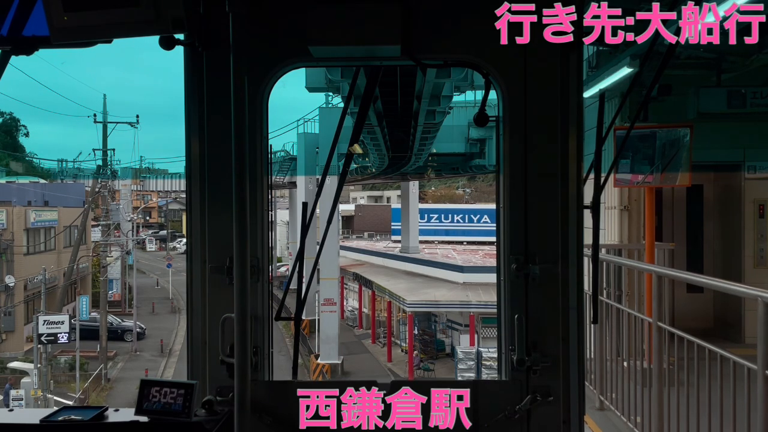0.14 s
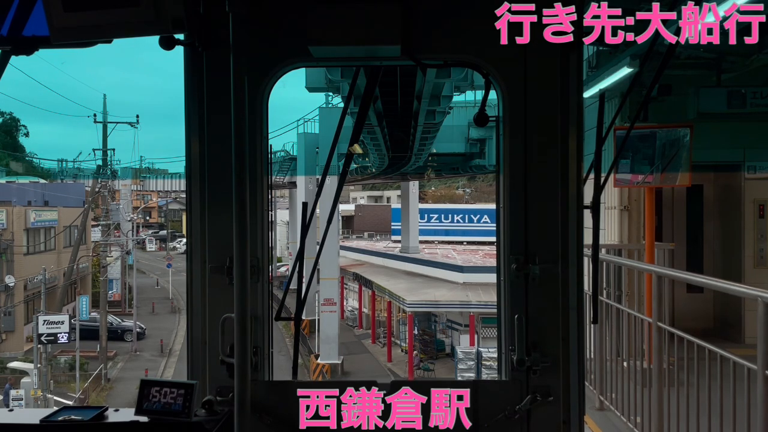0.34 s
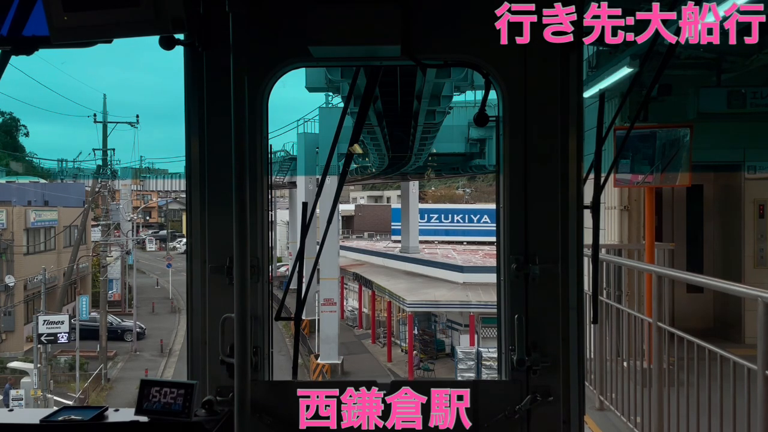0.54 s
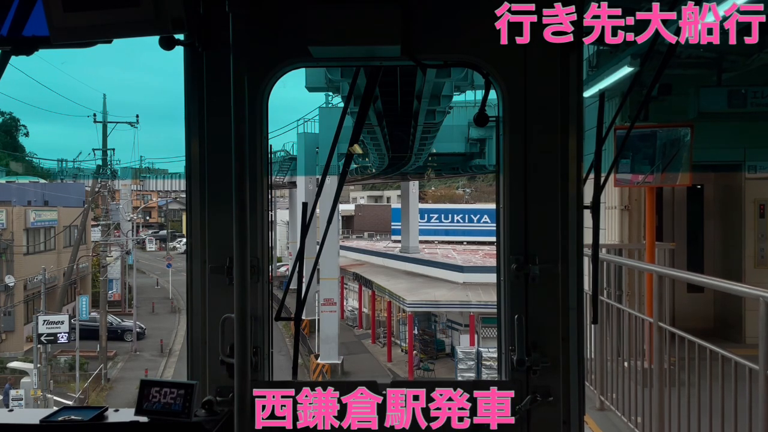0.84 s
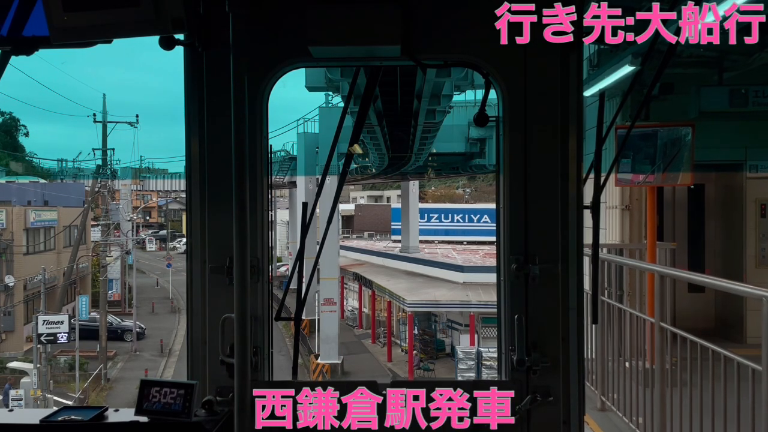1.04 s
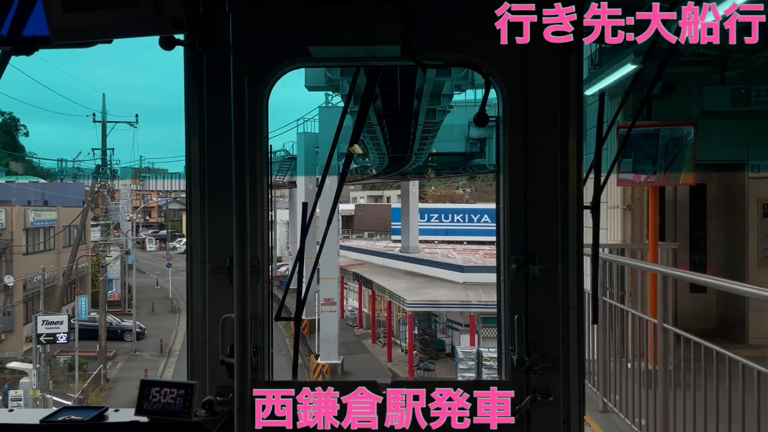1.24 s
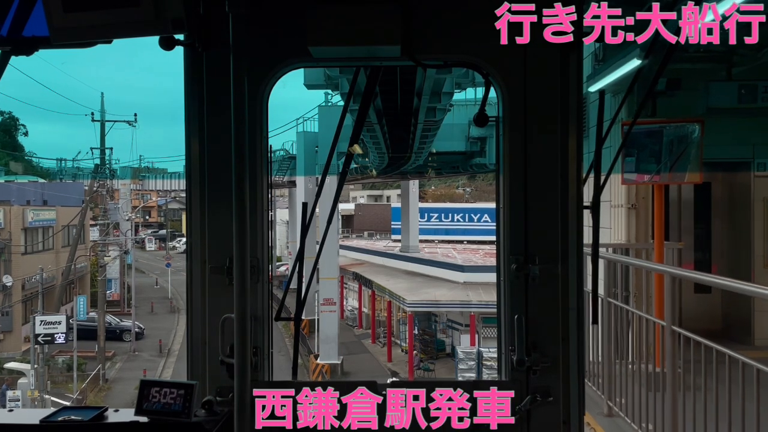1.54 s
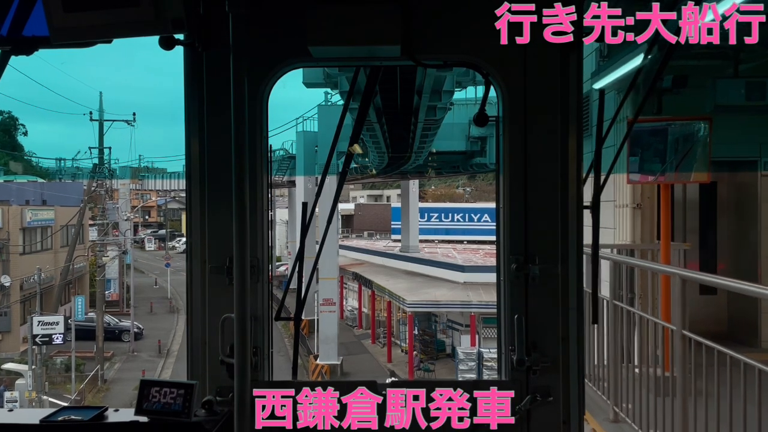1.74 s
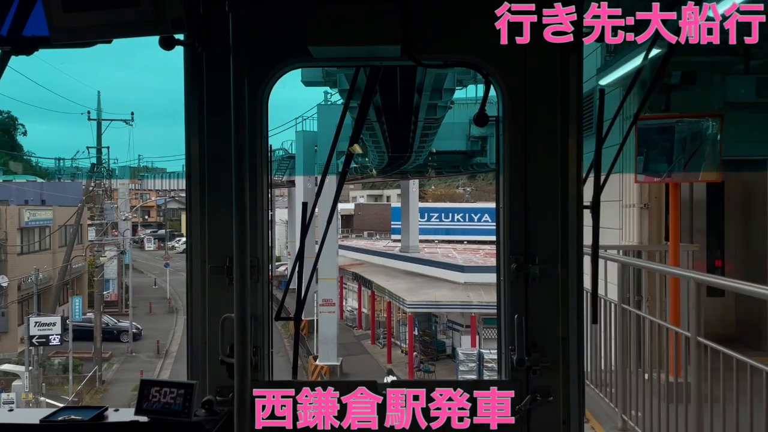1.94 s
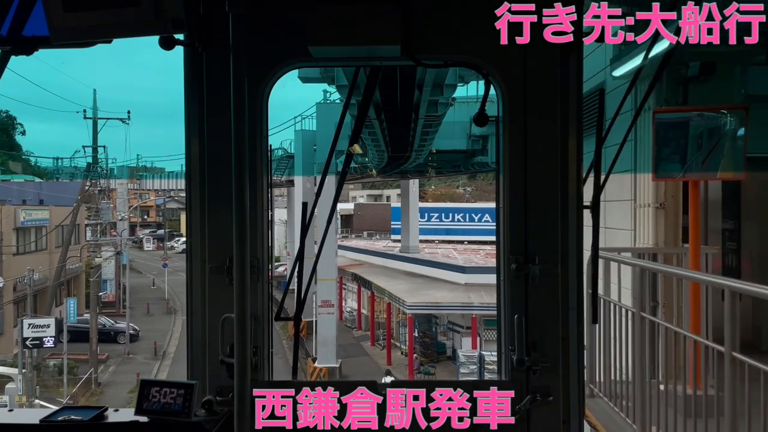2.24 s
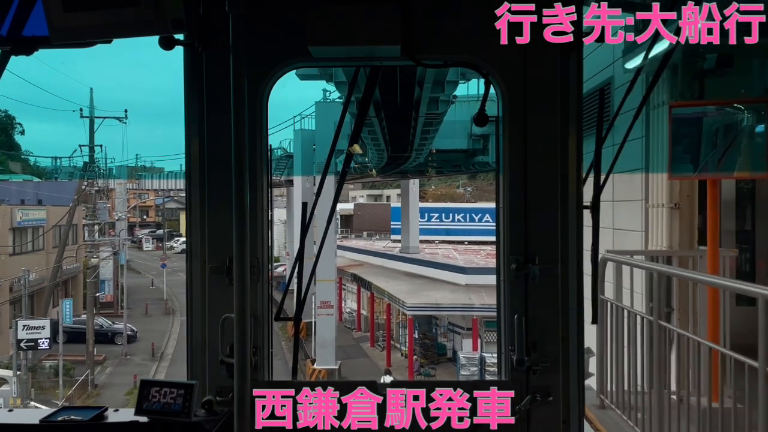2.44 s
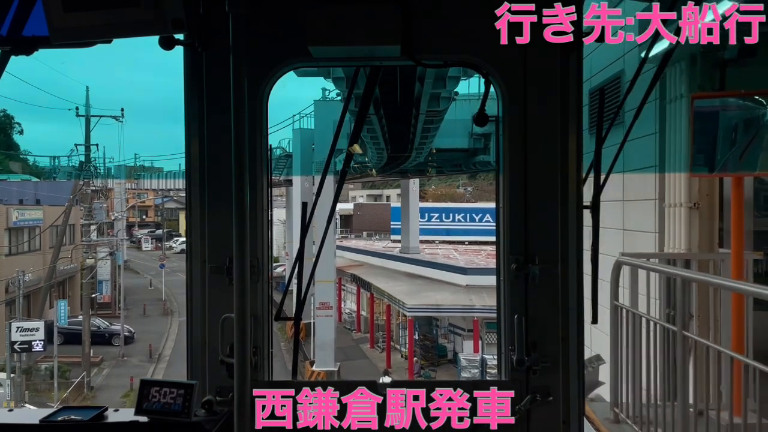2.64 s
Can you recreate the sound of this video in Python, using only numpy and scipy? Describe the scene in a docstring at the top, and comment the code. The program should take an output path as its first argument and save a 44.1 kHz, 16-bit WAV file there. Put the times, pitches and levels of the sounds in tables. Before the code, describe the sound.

A suspended rail car pulls away, heard close inside the cab. A steady hum near 280 Hz swells to its strongest around 0.7-0.95 s, edges slightly upward in pitch, then fades. Uneven hollow rumble, faint airy hiss and very weak whines continue. Light ticks, scuffs and dull thuds begin at 0.3-0.4 s; a hard click snaps left at 1.27 s with a thump; knocks cluster around 1.55-2.1 s, then calmer humming.

```python
"""Inside a suspended monorail car as it starts to move, heard at two close microphone ports.
From the start a steady tone hums, swells and fades over resonant rolling noise, broadband air hiss and
faint narrowband whines. From 0.3 s come light ticks and scuffs, decaying noise bursts from the left, and
from 0.4 s dull thuds that ring the modes of the body. At about 1.27 s one hard click sounds from the left:
short modes, a noise crack and a diffuse tail."""
import sys
import numpy as np
from scipy import signal
from scipy.fft import rfft, irfft, next_fast_len
from scipy.io import wavfile
from scipy.ndimage import uniform_filter1d, minimum_filter1d, map_coordinates

SR = 44100
rng = np.random.default_rng(int(sys.argv[2]) if len(sys.argv) > 2 else 0)


def store_wav(level_fs):
    """Save 16-bit WAV to argv[1]."""
    pcm = np.round(np.clip(np.atleast_2d(level_fs), -1, 1) * 32767)
    wavfile.write(sys.argv[1], SR, pcm.T.astype(np.int16))


N = 123479

# Course of the hum: (time [s], pitch [Hz], level [dB])
HUM_COURSE = [(0, 278, -27), (.12, 278, -29), (.34, 277.5, -23.5), (.54, 277.5, -20.5), (.7, 277.6, -15.5),
              (.92, 277.8, -15), (.99, 281, -16), (1.2, 281.5, -19), (1.4, 283, -20), (1.6, 281.5, -22),
              (1.85, 280.5, -23.5), (2.15, 280.5, -23), (2.45, 280.5, -26), (2.8, 280.5, -30.5)]
HUM_WAVER_DB, HUM_SIDE_DB = .7, -13

# Modes of the car body: (frequency [Hz], bandwidth [Hz], relative level [dB], basic t60 [s])
BODY_MODES = [(54.4, 14.5, 0, 0.27), (79.87, 10.3, -0.5, 0.6), (120.03, 6.9, 1.5, 0.43),
              (193.9, 27.1, -0.5, .3), (234.4, 11.94, 9, 0.28), (294.6, 25, -2.5, 0.53),
              (312.3, 16.7, -6.5, 0.42), (431.3, 23.6, -12.5, 0.16), (533.7, 46, -23.5, 0.086),
              (691, 90, -26.5, 0.083)]

# Course of the rolling noise: (time [s], level over 150 Hz [dB], level under 150 Hz [dB])
ROLL_COURSE = [(0, -25.5, -28.5), (.15, -31, -35), (.45, -28, -35), (.7, -33, -30), (1.0, -26.5, -34),
               (1.2, -23, -30), (1.5, -26.5, -24), (1.75, -26.5, -34), (1.95, -24, -22.5), (2.3, -29, -28),
               (2.8, -34.5, -32.5)]
ROLL_SIDE_DB = -13.5

# Course of the hiss: (time [s], level [dB])
AIR_COURSE = [(0.0, -47), (2.8, -45)]
# Relative spectrum of the sum of the ports: (frequency [Hz], density [dB per Hz])
AIR_MID_SPECTRUM = [(180, -42.5), (300, -1.5), (326, -16.5), (418, -13), (454, -14), (798, -27),
                    (911, -23.5), (1650, -28), (6990, -53.5), (8670, -85), (11100, -64), (15800, -70)]
# Relative spectrum of their difference: (frequency [Hz], density [dB per Hz])
AIR_SIDE_SPECTRUM = [(180, -37.5), (300, -8.5), (321, -5), (654, -4.5), (759, -8), (1450, -15),
                     (2760, -27.5), (3490, -30), (8820, -41), (15800, -77)]
AIR_SIDE_DB, AIR_LEFT = -4.5, .2  # side against mid; share of the mid noise in the side

# Lines of fans and equipment: (frequency [Hz], level [dB], width at half amplitude [Hz])
WHINE_LINES = [(1740, -59, 90), (2525, -67, 14), (2635, -66, 14), (3540, -63.5, 260)]

# Noise bursts: (time [s], level before the envelope [dB], rise [s], t60 [s], centre [Hz],
#                distance from centre to 1/e amplitude [octaves])
SCUFF_BURSTS = [(.32, -55, .001, .06, 10500, .27), (.53, -42.5, .0012, .056, 3600, .37),
                (.563, -30, .0015, .07, 650, .4), (.585, -25, .022, .3, 553, .64),
                (.58, -44, .033, .37, 3500, .9), (.688, -48.5, .001, .028, 4490, .28),
                (.855, -30, .001, .06, 650, .7), (1.119, -40, .002, .25, 1800, 1.5),
                (1.135, -31, .01, .18, 600, .58), (1.298, -29, .006, .3, 600, .35),
                (1.57, -47, .012, .3, 4170, .8), (1.693, -33.5, .004, .1, 600, .53),
                (1.81, -32, .0088, .12, 750, .9), (1.913, -31, .002, .08, 600, .5),
                (1.914, -39.5, .029, .15, 4960, .4), (1.97, -17, .007, .33, 380, .75),
                (1.974, -31, .001, .053, 1500, .42), (2.004, -33, .004, .12, 1750, .4),
                (2.005, -49, .006, .13, 11500, .26), (2.005, -34, .0061, .18, 2500, 2.1),
                (2.126, -49, .0024, .054, 7040, .61)]
SCUFF_PAN_DB, SCUFF_WIDE = 3.5, 0.067  # left over right; gain of the unshared noise

# Blows: (time [s], level [dB], boom under 100 Hz [dB], boom from 100 to 150 Hz [dB],
#         tilt of the upper modes [dB per octave], share of the basic t60 left to the upper modes)
THUD_BLOWS = [(.40, -28.5, 11, -14.5, -1, .9), (.46, -30.5, 14, -8, -1, .9),
              (0.561, -24, -13.5, 1, 12, 1.2), (0.604, -18, -3, -13.5, 12.5, 0.48),
              (0.656, -21.5, -22, 4, -6, 0.99), (0.852, -26, -16, -7.5, -10.5, 1.4),
              (1.135, -33, -1, -13.5, 21.5, 0.88), (1.277, -11.5, -10, -17, 6, 0.45),
              (1.29, -9, -8.5, -10, 4, 0.26), (1.553, -16, -1.5, -9.5, 1, 1.25),
              (1.694, -29, -2, -13, -1, 0.84), (1.81, -25.5, -2, 0.5, 14, .9),
              (1.962, -13.5, -12, -6, -5, 0.36), (1.974, -9, -7, -11, 14.5, 0.55),
              (1.995, -20, -9, -7.5, -5, .9), (2.109, -19.5, -9, -2, -6, 0.8)]
THUD_RISE_S, THUD_SIDE_DB = 0.0056, -12  # rise is a time constant

# Modes of the click: (frequency [Hz], relative level [dB], t60 [s])
CLICK_MODES = [(350.5, 10.5, 0.047), (435.4, 5.5, 0.092), (519, 3, 0.066), (718, -5, 0.099),
               (911, -7, 0.09), (1096, -15.5, 0.11), (1258, -5, 0.055), (1416, -8.5, 0.043),
               (1667, -16.5, 0.051), (1990, -12, 0.033), (2586, 0.5, 0.026), (2870, -10.5, 0.027),
               (3556, 3, 0.022), (4560, -11.5, 0.02)]
# Relative spectrum of the click noise: (frequency [Hz], gain [dB])
CLICK_SPECTRUM = [(300, -8.5), (1000, -4.5), (3000, -6.5), (5000, -9.5), (7000, -18), (9000, -33.5),
                  (16000, -73)]
CLICK_S, CLICK_DB, CLICK_PAN_DB = 1.2655, -9.5, 8.5
CLICK_RISE_S, CLICK_RISE_CYCLES = 0.0008, 4  # rise of the whole; rise of each mode
CLICK_NOISE_DB, CLICK_NOISE_T60 = -2.5, 0.043
CLICK_DULL_HZ, CLICK_BRIGHT_T60 = 4500, .022  # the noise above this frequency decays faster
CLICK_TAIL_DB, CLICK_TAIL_T60 = -20, 0.23

# Phase offset between the channels of the bursts and the click: (frequency [Hz], offset [rad])
PHASE_OFFSET = [(330, -0.23), (600, 2), (2000, 0), (4500, 1), (7000, 1.5), (8600, -19.5), (10500, 5.5),
                (12000, 7.5), (16000, 8.5)]
# Band in which the left channel is raised and the right lowered: (lower edge [Hz], upper edge [Hz])
PAN_BAND = (400, 6500)
TOP_HZ, PEAK_LIMIT = 15800, .92


def amp(db):
    """Decibel law: level to amplitude ratio."""
    return 10 ** (np.asarray(db) / 20)


def unit(x):
    """Normalisation of power: scale to rms 1."""
    return x / np.sqrt(np.mean(x ** 2) + 1e-20)


def along(points, hz):
    """Linear interpolation of (frequency, value) points on a logarithmic frequency axis."""
    f, v = np.transpose(points)
    return np.interp(np.log(hz + 1), np.log(f + 1), v)


def curves(rows):
    """Linear interpolation in time: one value per sample for each column after the time."""
    times, *columns = np.transpose(rows)
    return [np.interp(np.arange(N) / SR, times, column) for column in columns]


def wobble(rate):
    """Spline interpolation of random knots, rate a second, into a smooth curve."""
    knots = rng.standard_normal(int(N * rate / SR) + 4)
    return map_coordinates(knots, [np.arange(N) * rate / SR])


def filtered(x, response):
    """Convolution theorem: multiply the spectrum of x by a response of frequency."""
    n = x.shape[-1]
    m = next_fast_len(n + 8192)
    return irfft(rfft(x, m) * response(np.fft.rfftfreq(m, 1 / SR)), m)[..., :n]


def patchy(depth_db):
    """Time-frequency modulation: two independent noises share patches of random gain."""
    z = signal.stft(rng.standard_normal((2, N)), nperseg=512)[2]
    field = rng.standard_normal(z.shape[1:])
    field = uniform_filter1d(field, size=8, axis=0)
    field = uniform_filter1d(field, size=8, axis=1, mode="wrap")
    return signal.istft(z * amp(depth_db * unit(field)), nperseg=512)[1][:, :N]


def ports(x, pan_db):
    """Stereo placement: a frequency-dependent phase offset, and a mid-band level difference to the left."""
    low, high = PAN_BAND

    def lean(hz):
        band = hz ** 4 / (hz ** 4 + low ** 4) / (1 + (hz / high) ** 6)
        return amp(pan_db / 2 * band)

    def response(hz):
        return np.array([lean(hz), np.exp(-1j * along(PHASE_OFFSET, hz)) / lean(hz)])

    return filtered(x, response)


def stereo(mid, side):
    """Sum-and-difference principle: left is mid plus side, right is mid minus side."""
    return np.array([mid + side, mid - side])


def add(track, s, x):
    """Superposition: mix x into track at time s."""
    part = track[..., round(s * SR):][..., :x.shape[-1]]
    part += x[..., :part.shape[-1]]


def hum():
    """Frequency modulation: the phase integrates a drifting pitch; a quadrature side offsets the ports."""
    hz, db = curves(HUM_COURSE)
    phase = 2 * np.pi * np.cumsum(hz) / SR
    tone = stereo(np.sin(phase), amp(HUM_SIDE_DB) * np.cos(phase))
    return np.sqrt(2) * amp(db + HUM_WAVER_DB * wobble(12.62)) * tone


def roll():
    """Forced resonance: wheel noise excites the body modes; low and high modes swell apart."""
    def modes(f):
        total = 0
        for k, (centre, width, db, _) in enumerate(BODY_MODES):
            resonance = 1j * f * width / (centre * centre - f * f + 1j * f * width)
            total = total + (-1) ** k * amp(db) * resonance  # neighbours alternate in sign
        return total

    noise = rng.standard_normal((2, N))
    high_db, low_db = curves(ROLL_COURSE)
    high = unit(filtered(noise, lambda f: modes(f) * (f > 150)))
    low = unit(filtered(noise, lambda f: modes(f) * (f <= 150) * f ** 2 / (f ** 2 + 40 ** 2)))
    mid, side = amp(high_db) * high + amp(low_db) * low
    return stereo(mid, side * amp(ROLL_SIDE_DB))


def air():
    """Broadband flow noise: the wide hiss of the ventilation, slightly to the left."""
    a, b = patchy(depth_db=.7)
    # The level refers to the mid signal between 600 and 6000 Hz.
    reference = unit(filtered(a, lambda f: amp(along(AIR_MID_SPECTRUM, f)) * (f > 600) * (f < 6000)))
    mid = filtered(a, lambda f: amp(along(AIR_MID_SPECTRUM, f)) * (f > 280))
    mid = mid * np.dot(reference, reference) / np.dot(reference, mid)
    side = filtered(b + AIR_LEFT * a, lambda f: amp(along(AIR_SIDE_SPECTRUM, f)) * (f > 280))
    side = unit(side) * np.std(mid) * amp(AIR_SIDE_DB)
    return amp(curves(AIR_COURSE)[0] + 0.4 * wobble(24)) * stereo(mid, side)


def whines():
    """Narrowband noise: faint fuzzy lines of fans and equipment."""
    def line(hz, width):
        noise = rng.standard_normal((2, N))
        return unit(filtered(noise, lambda f: 1 / (1 + ((f - hz) / width * 2) ** 2)))

    return sum(amp(db) * line(hz, width) for hz, db, width in WHINE_LINES)


def scuffs():
    """Transient friction noise: light ticks and scrapes as decaying bursts round a centre frequency."""
    out, t = np.zeros((2, N)), np.arange(SR // 4) / SR
    for s, db, rise, t60, hz, octaves in SCUFF_BURSTS:
        def band(f):
            return np.exp(-(np.log2((f + 1) / hz) / octaves) ** 2)

        near, *wide = unit(filtered(rng.standard_normal((3, len(t))), band))
        shape = amp(db - 60 * t / t60) * np.minimum(t / rise, 1)
        add(out, s, shape * (ports(near, SCUFF_PAN_DB) + SCUFF_WIDE * np.array(wide)))
    return out


def thuds():
    """Modal superposition: soft blows on the floor ring the body modes, each decaying exponentially."""
    out, t = np.zeros((2, N)), np.arange(SR // 2) / SR
    hz, _, level, t60 = (column[:, None] for column in np.transpose(BODY_MODES))
    for s, db, boom_db, second_db, tilt_db, share in THUD_BLOWS:
        upper_db = tilt_db * np.log2(hz / 235)
        extra = np.where(hz < 100, boom_db, np.where(hz < 150, second_db, upper_db))
        extra = extra + np.where(hz < 70, -10, 0)
        ring_t60 = t60 * np.where(hz < 150, 1, share)
        rings = amp(db + level + extra - 60 * t / ring_t60) * (1 - np.exp(-t / THUD_RISE_S))
        phase = 2 * np.pi * hz * t + rng.normal(0, .3, hz.shape)
        mid = (rings * np.sin(phase)).sum(axis=0)
        # The side grows with frequency and has its own phases.
        side_phase = phase + rng.normal(0, 1.0, hz.shape)
        side = amp(THUD_SIDE_DB) * (rings * hz / 300 * np.sin(side_phase)).sum(axis=0)
        add(out, s, stereo(mid, side))
    return out


def click():
    """Impact excitation: a hard part snaps home, with short modes, a crack and the cabin's answer."""
    out, t = np.zeros((2, N)), np.arange(SR // 4) / SR
    noise = rng.standard_normal((3, len(t)))
    noise = unit(filtered(noise, lambda f: amp(along(CLICK_SPECTRUM, f))))
    dull = filtered(noise, lambda f: 1 / (1 + (f / CLICK_DULL_HZ) ** 6))
    bright = noise[0] - dull[0]
    ring = np.zeros(len(t))
    for hz, db, t60 in CLICK_MODES:
        mode = np.sin(2 * np.pi * (hz * t + rng.random()))
        ring += amp(db - 60 * t / t60) * mode * np.minimum(t * hz / CLICK_RISE_CYCLES, 1)
    # The treble of the crack dies first.
    crack = amp(-60 * t / CLICK_NOISE_T60) * dull[0] + amp(-60 * t / CLICK_BRIGHT_T60) * bright
    crack = amp(CLICK_NOISE_DB) * crack
    rise = np.sin(np.pi / 2 * np.minimum(t / CLICK_RISE_S, 1)) ** 2
    tail = amp(CLICK_TAIL_DB - 60 * t / CLICK_TAIL_T60) * (1 - np.exp(-t / 0.0026)) * dull[1:]
    add(out, CLICK_S, amp(CLICK_DB) * (ports(rise * (ring + crack), CLICK_PAN_DB) + tail))
    return out


def scene():
    """Linear superposition of all sources."""
    return hum() + roll() + air() + whines() + scuffs() + thuds() + click()


def record(dry):
    """Peak limiting by a smoothed gain common to both ports, then band limitation at TOP_HZ."""
    need = np.minimum(1, PEAK_LIMIT / (np.abs(dry).max(axis=0) + 1e-9))
    gain = uniform_filter1d(minimum_filter1d(need, size=221), size=111)
    return filtered(dry * gain, lambda hz: hz < TOP_HZ)


dry = scene()
out = record(dry)
store_wav(out)
```